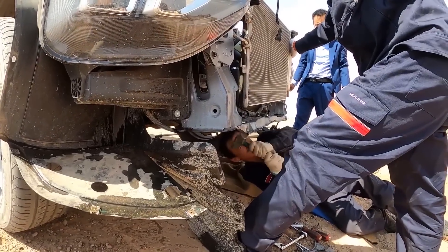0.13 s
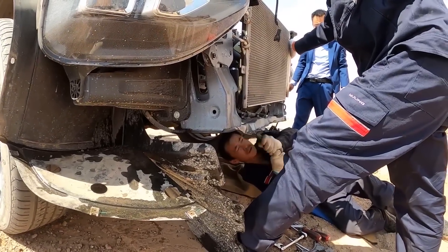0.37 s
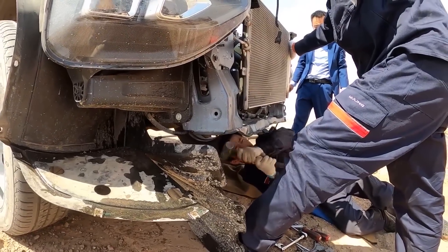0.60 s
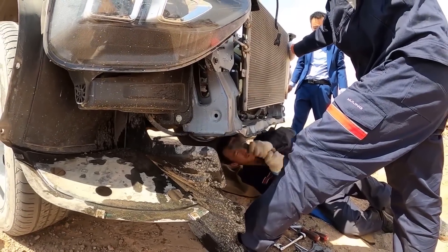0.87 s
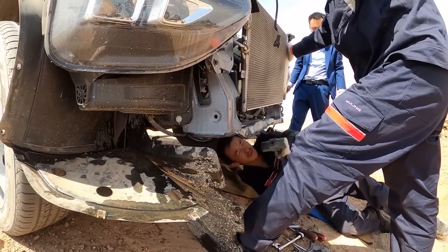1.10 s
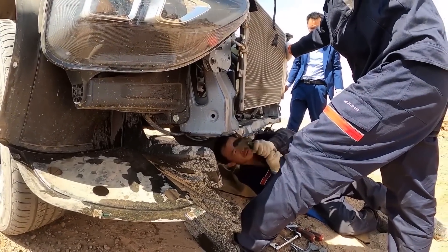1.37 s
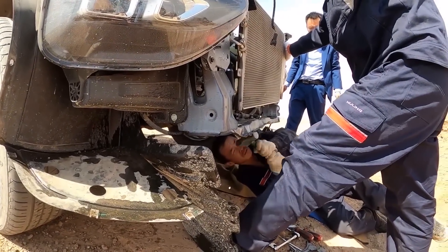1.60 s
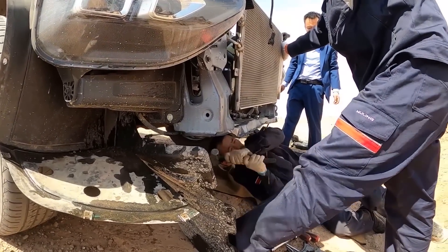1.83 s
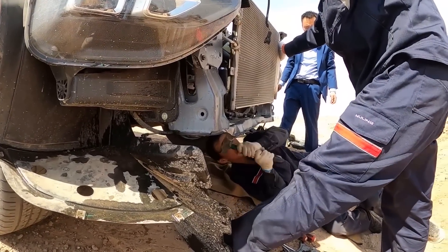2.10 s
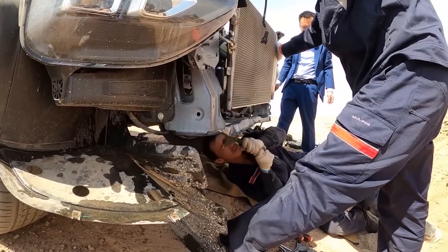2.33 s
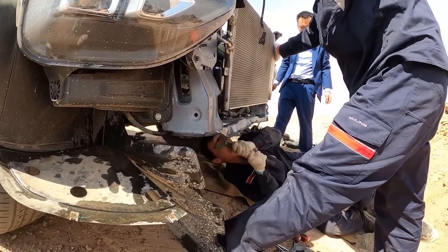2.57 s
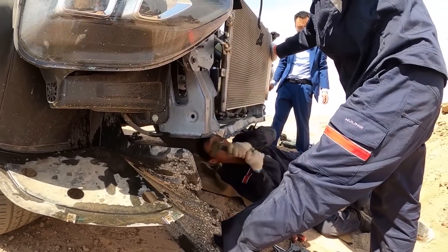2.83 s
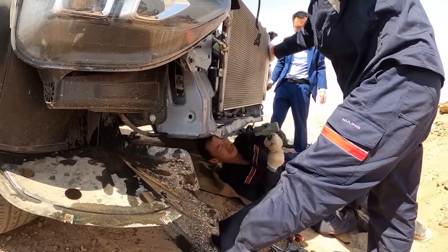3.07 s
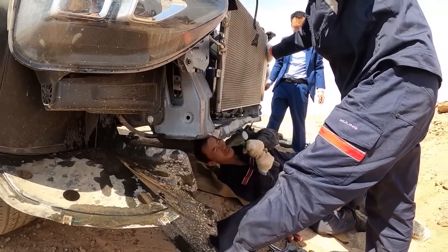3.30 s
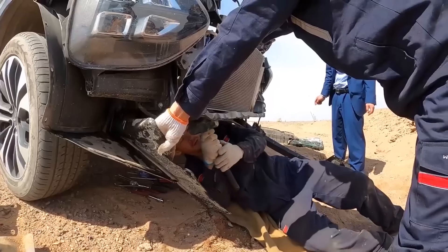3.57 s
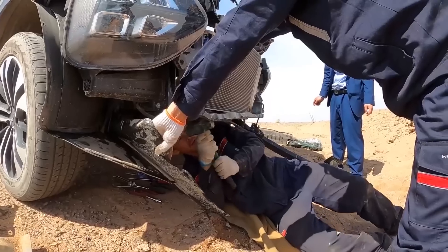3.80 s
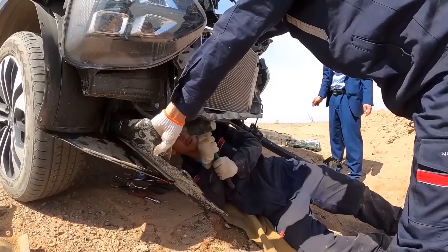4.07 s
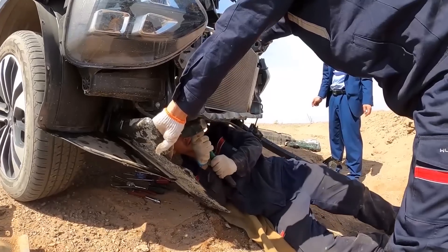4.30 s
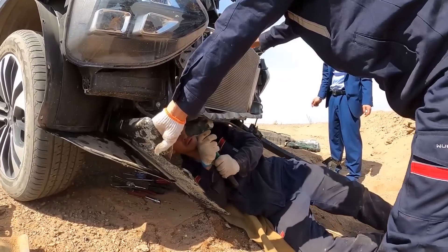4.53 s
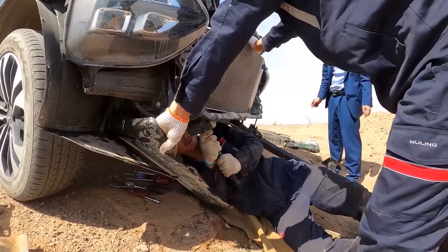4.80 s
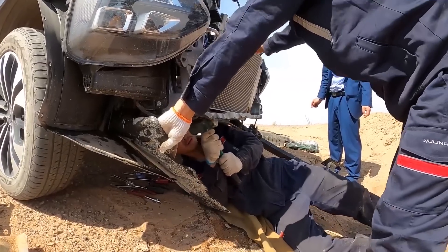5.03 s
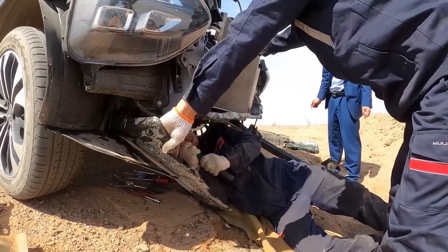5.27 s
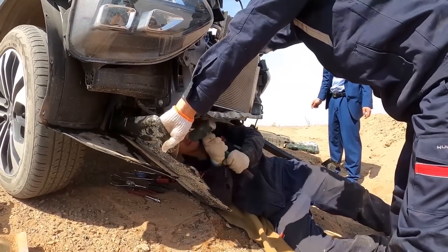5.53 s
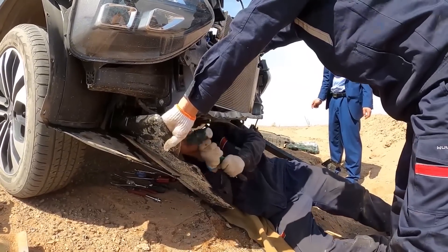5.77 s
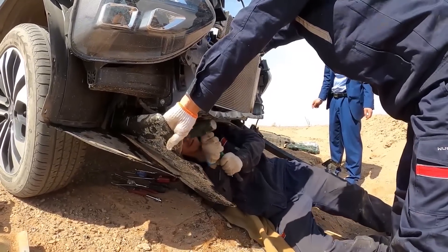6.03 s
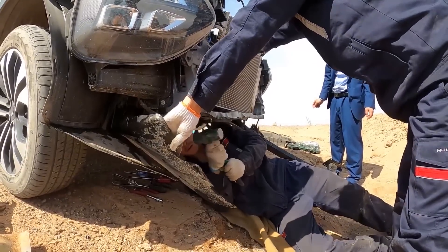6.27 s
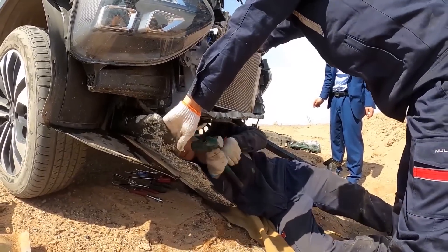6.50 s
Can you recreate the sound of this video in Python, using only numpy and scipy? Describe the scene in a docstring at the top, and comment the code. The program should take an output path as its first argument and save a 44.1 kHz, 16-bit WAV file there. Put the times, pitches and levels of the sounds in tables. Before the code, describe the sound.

Outdoors on sandy ground, close microphones hear a hammer working on a car's steel underside. Blows land at about 0.2, 0.65, 1.15, 1.7, 2.2, 2.7 and 3.1 seconds: hard, dry cracks with a damped mid-low clank and a brief boom of the body, dying within a few tenths of a second. Faint ticks fall between them, over soft wind, distant traffic rumble and a low idling engine near 70 hertz. At about 3.5 the hum jumps up as if suddenly closer, wavering, with a brief drop near 5.3. Blows now ring more freely with a loose bracket, at 3.65, 4.3, 4.65, 4.9, a quick pair near 5.2, a strong one at 5.75 with a faint after-tap, and a last at 6.3. Knocks, gritty scrapes and small clatters cluster around 3.75 to 4.2 and 5 to 6. It ends at about 6.6 as the hum eases.

```python
"""Outdoors on sandy ground, a hammer works on the steel underside of a car.
Each blow excites damped frame modes, a looser bracket and a low body boom, under a crack of shaped noise.
Loose parts tick and knock as short cracks and clanks; drags hiss and clatter as grains and snags.
An idling engine hums as a wavering sine over filtered-noise wind and traffic rumble;
halfway the hum jumps up, as if suddenly closer, and dips briefly now and then."""
import sys
import numpy as np
from scipy import signal
from scipy.fft import rfft, irfft
from scipy.io import wavfile

SR = 44100
rng = np.random.default_rng(int(sys.argv[2]) if len(sys.argv) > 2 else 0)


def how_loud(loudness_db):
    """Turn decibels into a plain amplitude multiplier (0 dB gives 1, 20 dB gives 10)."""
    steps = np.asarray(loudness_db, float) / 20
    return 10 ** steps


def store_pcm(level_fs):
    """Save levels as 16-bit WAV."""
    pcm = np.round(np.clip(level_fs, -1, 1) * 32767).astype(np.int16)
    wavfile.write(sys.argv[1], SR, np.atleast_2d(pcm).T)


N = 292383   # samples


def at_hz(points, hz):
    """Read a table on a log-frequency axis."""
    return np.interp(np.log(hz), np.log(np.array(points)[:, 0] + 1e-9), np.array(points)[:, 1])


def in_time(rows):
    """Draw a table as a curve at every sample."""
    return np.interp(np.arange(N) / SR, *np.transpose(rows))


def rms_one(x):
    """Scale to unit power."""
    return x / np.sqrt(np.mean(x ** 2) + 1e-20)


def drift(rate):
    """Slow random curve of spread 1: noise through two equal low-pass poles at rate Hz."""
    pole = np.exp(-80 * np.pi * rate / SR)   # drawn at every 40th sample
    noise = rng.standard_normal(N // 40 + 2002)
    slow = signal.lfilter([1], [1, -2 * pole, pole * pole], noise)[2000:]
    return np.interp(np.arange(N) / 40, np.arange(len(slow)), rms_one(slow))


def ring(clicks, hz, t60):
    """A resonance: a unit click sets a sine of height 1 ringing, down 60 dB after t60 seconds."""
    radius = how_loud(-60 / (t60 * SR))
    turn = 2 * np.pi * hz / SR
    poles = [1, -2 * radius * np.cos(turn), radius * radius]
    return signal.lfilter([0, np.sin(turn)], poles, clicks + 1e-18)


def bands(x):
    """Half-octave slices of two unrelated signals, dealt in turn: (centre Hz, slice)."""
    edges = 22 * 2 ** np.arange(0, 9.6, .5)
    for k, (low, high) in enumerate(zip(edges, edges[1:])):
        band_pass = signal.butter(3, [low, high], "band", fs=SR, output="sos")
        yield np.sqrt(low * high), signal.sosfilt(band_pass, x[k % 2])


# wind and traffic rumble; its offsets are added in ambience(): t/s, level/dB
RUMBLE_LEVEL = [(0, -48), (1.5, -54.5), (3.45, -52.5), (3.5, -48), (4.5, -48), (5.4, -47.5), (6.0, -50),
                (6.63, -54.5)]
# colour of the rumble: f/Hz, level/dB in 1 Hz
RUMBLE_COLOUR = [(12, -40), (20, -11), (49, 2.5), (81, -5), (109, -11), (148, -12.5), (263, -19),
                 (468, -39.5), (1290, -39.5), (1890, -47.5), (5990, -55.5), (8550, -65.5), (14000, -85.5)]
# idling engine, louder from halfway, with brief dips: t/s, level/dB
ENGINE_LEVEL = [(0, -47), (.6, -48.5), (1.5, -50.5), (1.65, -46.5), (2.1, -43), (2.9, -46), (3.48, -49.5),
                (3.53, -32), (3.75, -31.5), (3.86, -41.5), (3.92, -34.5), (4.13, -37.5), (4.5, -32),
                (5.26, -34), (5.32, -50), (5.38, -34.5), (5.6, -40.5), (6.63, -44)]
# fainter engine tones, following the rumble level: f/Hz, width/Hz, level/dB
ENGINE_TONES = [(132, 62, -7), (160.2, 18, -12), (215, 7, -18.5), (266.6, 1.8, -16.5), (444, 10, -35.5)]
ENGINE_HZ, ENGINE_WANDER_HZ, ENGINE_WAVER_DB = 68.4, 2.5, 4.5


def ambience():
    """Engine hum as a wavering low sine and narrow noisy lines, over dull rumble."""
    hum_level = how_loud(in_time(ENGINE_LEVEL) + ENGINE_WAVER_DB * drift(6.6))
    hum_hz = ENGINE_HZ + ENGINE_WANDER_HZ * drift(7.3)
    hum = np.sqrt(2) * hum_level * np.sin(2 * np.pi * np.cumsum(hum_hz) / SR)
    tones = np.zeros(N)
    for hz, width, level_db in ENGINE_TONES:
        t60 = 3.3 / width
        line = ring(ring(rng.standard_normal(N), hz, t60), hz, t60)
        tones += how_loud(level_db) * rms_one(line)
    rumble = 0
    for hz, (mid, side) in bands(rng.standard_normal((2, 2, N))):
        level = how_loud(at_hz(RUMBLE_COLOUR, hz) + 0.84 * drift(5))
        rumble = rumble + level * (mid + 0.2 * side * [[1], [-1]])
    rumble_db = in_time(RUMBLE_LEVEL)
    return hum + how_loud(rumble_db + 8.5) * tones + how_loud(rumble_db + 6) * rms_one(rumble)


def colour_db(hits, hz):
    """Level of every hit at one pitch, from peak, thump, panel and edge; a dull edge is duller still on top."""
    hits = np.array(hits)
    log_hz = np.log([140, 550, 2500, 7500, 15000])
    shape = [np.interp(np.log(hz), log_hz, [thump, panel, 0, edge, 1.6 * edge])
             for thump, panel, edge in hits[:, 2:5]]
    return hits[:, 1] + shape


def strike(hits, hz, level_db, t60, spread_s, vary_db, count=3):
    """Ring one mode: the contact chatters a few times, each touch with its own strength."""
    luck = rng.standard_normal((len(hits), 2 * count))
    touch = np.arange(count)
    late = np.abs(luck[:, :count]) * spread_s * touch + .35 / hz   # lows build up later
    at = np.minimum(((np.array(hits)[:, :1] + late) * SR).astype(int), N - 1)
    strength = how_loud(vary_db * luck[:, count:] - 2.2 * touch) * np.sign(luck[:, :count])
    clicks = np.zeros(N)
    np.add.at(clicks, at, how_loud(level_db)[:, None] * strength)
    return ring(clicks, hz, t60)


# colour of the struck steel: f/Hz, level/dB in 1 Hz
STEEL_COLOUR = [(44, -30), (75, -4), (161, 3.5), (441, -9), (565, -6.5), (723, -19), (1330, -13),
                (1480, -21.5), (1620, -15.5), (1900, -20), (2720, -16), (7130, -25), (12500, -68),
                (16000, -86)]
# how an average blow leans between thump, panel, middle and edge: f/Hz, level/dB
AVERAGE_LEAN = [(140, 3.5), (550, 0), (2500, 4.5), (7500, -11), (15000, -32)]
# damping of the steel, before each use shortens or stretches it: f/Hz, t60/s
DAMPING_T60 = [(50, 0.63), (130, 0.38), (350, 0.32), (920, 0.25), (2430, 0.11), (6400, 0.073)]


def dense_ring(hits, shorter, level_db, spread_s, count):
    """The many small modes of the frame, spread evenly on a square-root pitch scale."""
    out = np.zeros(N)
    for hz in np.linspace(9, 80, count) ** 2 * rng.uniform(.97, 1.03, count):
        steel_db = at_hz(STEEL_COLOUR, hz) - at_hz(AVERAGE_LEAN, hz)
        mode_db = colour_db(hits, hz) + steel_db + 5 * np.log10(hz) + level_db
        t60 = at_hz(DAMPING_T60, hz) * shorter * how_loud(rng.normal(0, 0.9))
        out += strike(hits, hz, mode_db, t60, spread_s=spread_s, vary_db=4.0, count=4)
    return out


def crack(hits, shorter, level_db, rattle_db, snap_db):
    """Noise of the contact and of shaken fittings: a snap, then a lumpy tail dying faster in the treble."""
    out = np.zeros((2, N))
    starts = (np.array(hits)[:, 0] * SR).astype(int)
    rattle = drift(76)
    for hz, (mid, side) in bands(rng.standard_normal((2, 2, N))):
        fall = np.zeros(N)
        for start, peak_db, share in zip(starts, colour_db(hits, hz), shorter):
            age = np.arange(min(N - start, SR // 2)) / SR
            turns = age / (share * at_hz(DAMPING_T60, hz))   # age in decay times
            rise = 1 - np.exp(-age * min(hz * 0.2, 600))
            tail_and_snap = how_loud(-60 * turns) + how_loud(snap_db - 280 * turns)
            fall[start:start + len(age)] += how_loud(peak_db) * rise * tail_and_snap
        lumps_db = rattle_db * (rattle + 0.33 * drift(44))
        steel_db = at_hz(STEEL_COLOUR, hz) - at_hz(AVERAGE_LEAN, hz)
        out += fall * how_loud(steel_db + level_db + lumps_db) * (mid + 0.21 * side * [[1], [-1]])
    return out


def soft(x):
    """The hammer face stays in touch long enough to round off the sharpest edge."""
    return signal.sosfilt(signal.butter(4, 7000, fs=SR, output="sos"), x)


# hammer blows, colours relative to 1.5-4 kHz: t/s, peak level/dB, thump/dB, edge/dB, bracket ring/dB
HAMMER_BLOWS = [(0.2029, -6, -7.5, -16.5, -12.5), (0.6511, -9, -10.5, -16.5, 8),
                (1.1494, -7.5, -6.5, -16.5, -6), (1.7116, -9.5, -13, -12, 3), (2.1925, -9, -3.5, -10.5, -1),
                (2.682, -10.5, -11, -16.5, -7), (3.1272, -7, -8, -12, -1), (3.6542, -12.5, -10, -25, 9),
                (4.3198, -10.5, -8, -14.5, 7.4), (4.663, -9, -11, -20.5, 8), (4.9247, -12, -12, -19, 4),
                (5.1583, -11, -19.5, -35, 3), (5.218, -16, -27.5, -35.5, -3),
                (5.7418, -6.5, -5.5, -14.5, -2), (5.8637, -22.5, -11, -39.5, -7.5),
                (6.32, -11, -10, -12.5, -10.5)]
# strongest frame modes, trimmed in level and t60 in hammer(): f/Hz, level/dB, t60/s
FRAME_MODES = [(96, -1.5, 0.43), (144.5, 2, 0.3), (209, -4.5, 0.46), (366, -8.5, 0.4), (508.2, -2.5, 0.17),
               (654, -14.5, 0.2), (787, -10, 0.23), (1031, -13, 0.29), (1106, -11.5, 0.23),
               (1150, -14.5, 0.13), (1244, -7.5, 0.13), (1314, -7.5, 0.14), (1370, -21.5, 0.057),
               (1590, -20.5, 0.06), (1784, -16.5, 0.074), (1994, -20.5, 0.12), (2120, -19.5, 0.088),
               (2199, -8, 0.065), (2260, -14, 0.09), (2474, -20.5, 0.12), (2620, -19.5, 0.16),
               (2916, -17.5, 0.14), (3305, -19, 0.085), (3380, -7.5, 0.014)]
# a freer bracket: f/Hz, level/dB, t60/s
BRACKET_MODES = [(1079, -20, 0.34), (1150, -27.5, .2), (2046, -38, .09), (3300, -29, 0.17),
                 (3980, -13.5, 0.06), (3010, -18, .07), (350, -28, 0.26), (235.4, -15, .19)]
# the whole car body answers a blow: f/Hz, level/dB against the thump, t60/s
BODY_BOOM = [(69, -6.5, .4), (42, -13.5, .35)]
BRACKET_FREED_S = 3.488
BLOW_PANEL_DB, PANEL_FOLLOWS = -8.5, .35   # the panels (near 550 Hz) take this share of the thump's dB
BOOM_SWELL_T60_S = 0.13   # how slowly the body's boom builds up


def hammer():
    """Blows ring the frame, its dense modes, the bracket and the car body, and crack."""
    s, peak_db, thump_db, edge_db, bracket_db = np.transpose(HAMMER_BLOWS)
    panel_db = BLOW_PANEL_DB + PANEL_FOLLOWS * thump_db
    blows = np.transpose([s, peak_db, thump_db, panel_db, edge_db])
    rings = dense_ring(blows, shorter=0.85, level_db=-22.5, spread_s=.003, count=160)
    for hz, mode_db, t60 in FRAME_MODES:
        level_db = colour_db(blows, hz) + mode_db - 4.5
        rings += strike(blows, hz, level_db, 0.92 * t60, spread_s=.004, vary_db=3.0)
    held_db = np.where(s < BRACKET_FREED_S, -20, 0)   # a hand damps the bracket until the work moves on
    for hz, mode_db, t60 in BRACKET_MODES:
        level_db = peak_db + bracket_db + held_db + mode_db
        rings += strike(blows, hz, level_db, t60, spread_s=.002, vary_db=-1.0, count=1)
    for hz, mode_db, t60 in BODY_BOOM:   # rung through a second resonance, so it swells before it dies
        level_db = peak_db + thump_db + mode_db
        push = strike(blows, hz, level_db, BOOM_SWELL_T60_S, spread_s=0, vary_db=2.0, count=1)
        rings += ring(push, hz, t60) * 2 * np.log(1000) / (BOOM_SWELL_T60_S * SR)
    cracks = crack(blows, [1.15] * len(blows), level_db=14.5, rattle_db=2.5, snap_db=13.0)
    return soft(rings) + cracks


# light ticks and knocks of loose parts: t/s, peak level/dB, body/dB, edge/dB, decay share of the steel's t60
LOOSE_TICKS = [(0.405, -49, -8, -4, 0.78), (0.7544, -48.5, 2, -34, 0.3), (0.7953, -48, -12, -38, 0.81),
               (0.8181, -32.5, -7.5, -18, 0.53), (1.0948, -51.5, 6, -14, 0.78),
               (1.4035, -48, -21.5, -2.5, 0.54), (2.109, -39.5, -25, -22, 0.81),
               (3.0358, -35.5, -24, -33.5, 0.55), (3.7352, -36, -6, -35, 0.61),
               (3.7853, -30.5, -4, -30, 0.6), (3.8024, -33.5, -8.5, -61, 0.88),
               (4.01, -28.5, -4.5, -44, 0.29), (4.0833, -24, 6, -28, 0.1), (4.1901, -18, -13, -5, 0.19),
               (4.9966, -51, -9, -4.5, 0.37), (5.068, -53, -13, -2, 0.37), (5.094, -47.5, 5, -16.5, 0.67),
               (5.261, -17, -20, -46, 0.41), (5.47, -58.5, -3, -23, 0.31), (5.5484, -39.5, -1, -45, 0.29),
               (5.599, -45.5, -16, -32, 0.33), (5.639, -48.5, -3, -21.5, 0.46), (5.944, -39, 3.5, -8, 0.18),
               (5.9839, -51.5, 16.5, -25, 0.39), (6.0476, -61.5, -15, 8.5, 0.37)]
# hollow taps of a handle on a panel: t/s, peak level/dB, f/Hz
HANDLE_TAPS = [(1.886, -33, 830), (6.286, -35, 798)]
TICK_THUMP_DB = -3   # lowest notes of a tick against its body


def loose_parts():
    """Small touches: a short crack, damped its own way, and a clank; taps add a hollow note."""
    s, peak_db, body_db, edge_db, share = np.transpose(LOOSE_TICKS)
    ticks = np.transpose([s, peak_db, body_db + TICK_THUMP_DB, body_db, edge_db])
    out = crack(ticks, np.clip(share, .05, 2), level_db=22.5, rattle_db=2.0, snap_db=-2.0)
    out += soft(dense_ring(ticks, shorter=.3, level_db=-26.0, spread_s=0.0017, count=60))
    taps = [(s, peak_db, -5, -8, -15) for s, peak_db, hz in HANDLE_TAPS]
    out += crack(taps, [.15] * len(taps), level_db=12.0, rattle_db=2, snap_db=6.0)
    for s, peak_db, hz in HANDLE_TAPS:
        out += strike([(s, peak_db)], hz, np.array([peak_db]), t60=.07, spread_s=0, vary_db=0, count=1)
    return out


# parts dragged over grit and steel, before the gain and tilt limit below:
# start t/s, length/s, level/dB, tilt/dB per octave, fade/dB per s
DRAGS = [(3.485, 0.22, -46, 5, 300), (3.725, 0.021, -40, -0.5, 897.5), (3.78, .03, -37.5, 0, 600.5),
         (3.847, .02, -57.5, 7, 63.5), (4.008, 0.022, -36.5, -0.5, 501), (4.05, 0.041, -30.5, -1, 700),
         (5.01, 0.29, -59.5, 9, 203), (5.232, 0.044, -41.5, -0.5, 801), (5.315, 0.81, -67.5, 6, 194),
         (5.53, 0.028, -46.5, 2.5, 652), (5.868, 0.013, -35.5, -1.5, 450.5),
         (5.929, 0.017, -41.5, 2, 420.5), (6.502, .13, -65.5, 9.5, 199)]
DRAG_ATTACK_S = 0.005


def drags():
    """Every drag rises, holds and fades; the loudest one sets the tilt: (level, tilt dB per octave)."""
    start, length, level_db, tilt, fade = np.transpose(DRAGS)[:, :, None]
    age = np.arange(N) / SR - start
    fade_db = np.abs(fade) * np.maximum(age - length, 0)
    each = np.clip(age / DRAG_ATTACK_S, 0, 1) * how_loud(level_db - fade_db) + 1e-9
    power = each ** 2
    return each.sum(axis=0), (tilt.clip(-6, 6) * power).sum(axis=0) / power.sum(axis=0)


# colour of the grit: f/Hz, level/dB in 1 Hz
GRIT_COLOUR = [(180, -34), (300, 6.5), (434, -25), (571, -2), (881, -15), (1050, -8.5), (2070, -15.5),
               (2590, -11), (3090, -20.5), (7240, -36.5), (14000, -67)]


def scrapes():
    """Fine grit hisses under each drag, and coarser snags clatter in short steel resonances."""
    level, tilt = drags()
    grain_db = 3.1 * np.minimum(rng.exponential(1, N), 5) + 1.8 * drift(70)
    grains = rng.standard_normal((2, 2, N)) * how_loud(grain_db)
    out = 0
    for hz, (mid, side) in bands(grains):
        band_db = at_hz(GRIT_COLOUR, hz) + tilt * np.log2(hz / 1500) + drift(21)
        out = out + level * how_loud(band_db) * (mid + 0.053 * side * [[1], [-1]])
    caught = rng.random(N) < 1500 / SR   # about 1500 snags a second
    snags = level * caught * how_loud(3.1 * np.minimum(rng.exponential(1, N), 4))
    dealt = rng.integers(0, 24, N)   # each snag rings one resonance
    for k, hz in enumerate(np.geomspace(450, 3600, 24)):
        clatter_db = at_hz(GRIT_COLOUR, hz) + tilt * np.log2(hz / 1500) - 8
        out = out + how_loud(clatter_db) * ring(snags * (dealt == k), hz, 76.0 / hz + 0.025)
    return out * how_loud(7.5)


# left against right: f/Hz, level/dB
LEFT_LEAN_DB = [(100, -0.72), (1000, -0.45), (2500, 1.1), (6000, -1.05), (13000, -1.5)]
LEFT_LAG_RAD, LAG_KNEE_HZ = 1, 4030


def scene():
    """Sources lie a little right of two close microphones: the left lags in phase and hears less top treble."""
    left, right = ambience() + hammer() + loose_parts() + scrapes()
    hz = np.fft.rfftfreq(N + 1, 1 / SR)
    lag = np.exp(-1j * LEFT_LAG_RAD * np.tanh(hz / LAG_KNEE_HZ))
    lean = how_loud(at_hz(LEFT_LEAN_DB, hz + 1))
    left = irfft(rfft(left, N + 1) * lag * lean, N + 1)[:N]
    return np.array([left, right])


def band_limit(x):
    """A steep low-pass at the top of the band."""
    return signal.sosfilt(signal.butter(12, 16320, fs=SR, output="sos"), x)


def record(dry):
    """Rounds the peaks of the mix by soft saturation."""
    mix = 1.29 * np.tanh(dry / 1.41)
    return band_limit(mix)


dry = scene()
out = record(dry)
store_pcm(out)
```